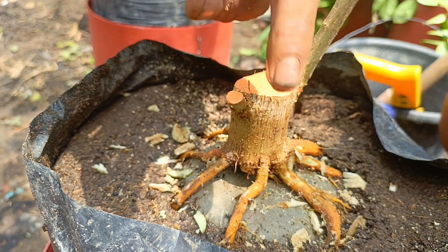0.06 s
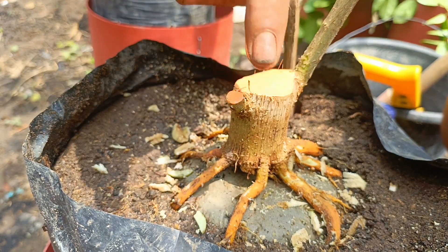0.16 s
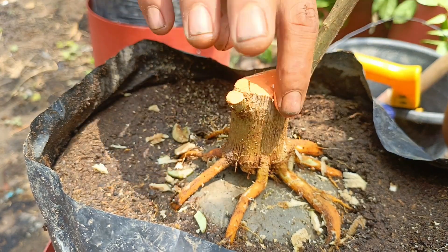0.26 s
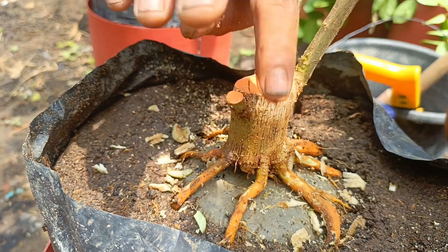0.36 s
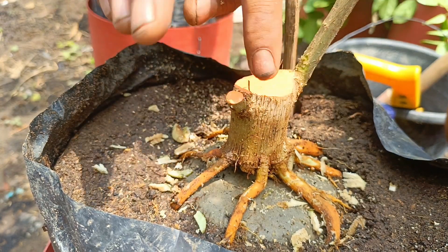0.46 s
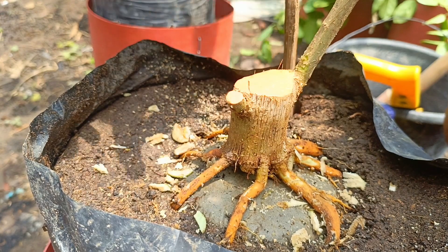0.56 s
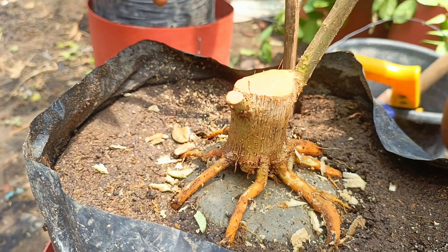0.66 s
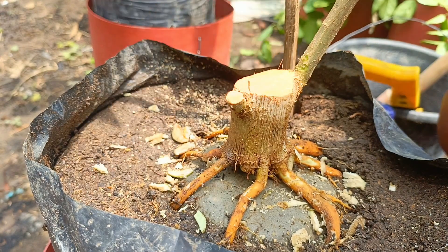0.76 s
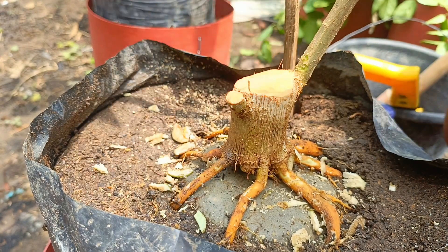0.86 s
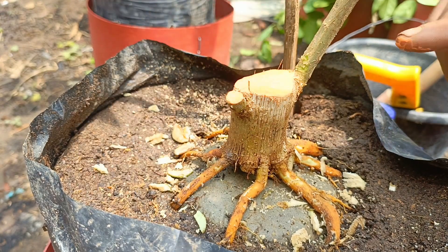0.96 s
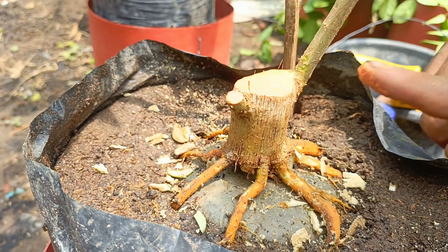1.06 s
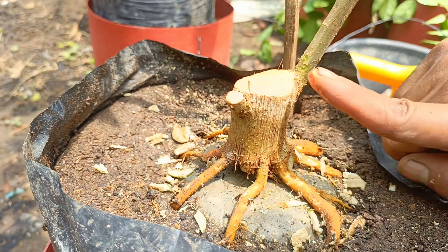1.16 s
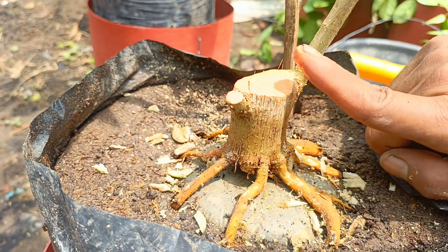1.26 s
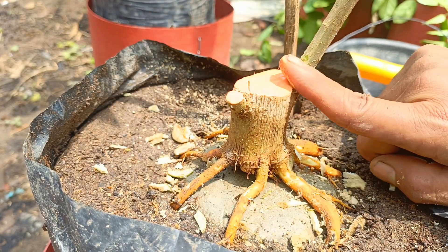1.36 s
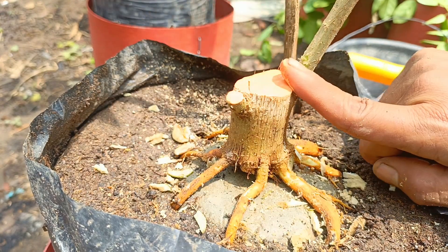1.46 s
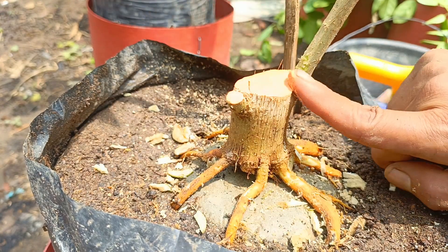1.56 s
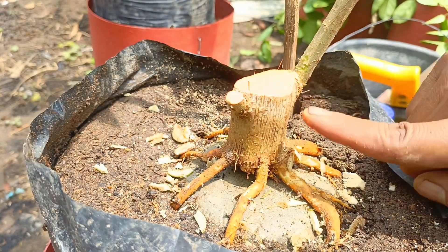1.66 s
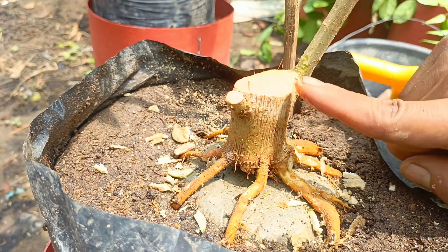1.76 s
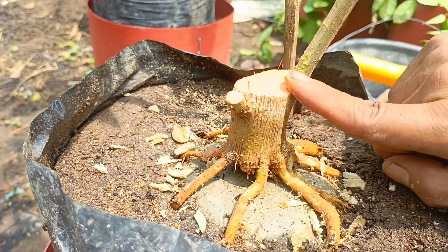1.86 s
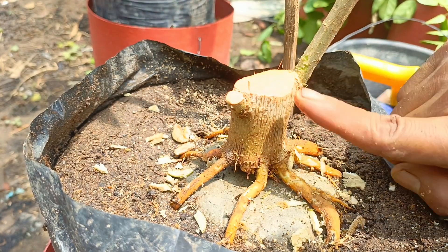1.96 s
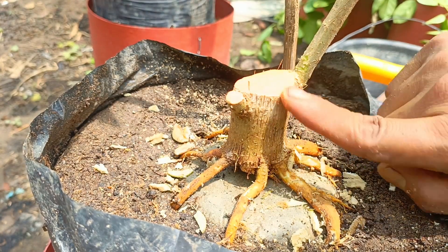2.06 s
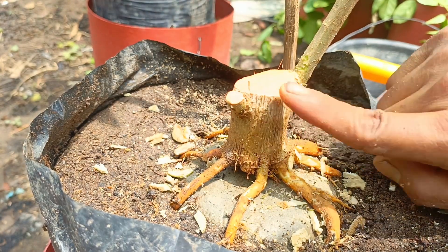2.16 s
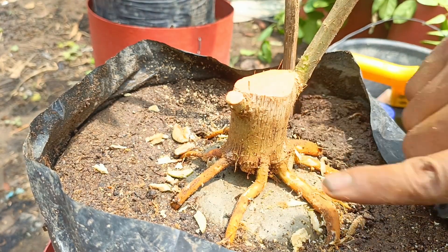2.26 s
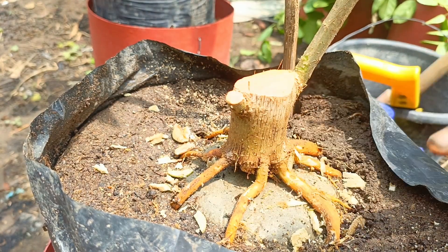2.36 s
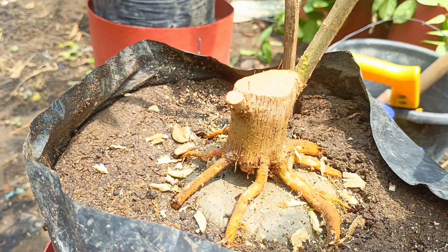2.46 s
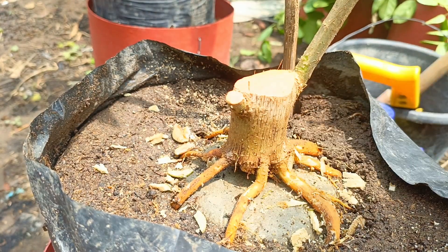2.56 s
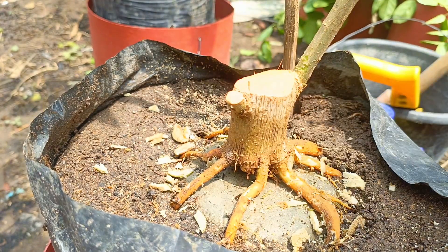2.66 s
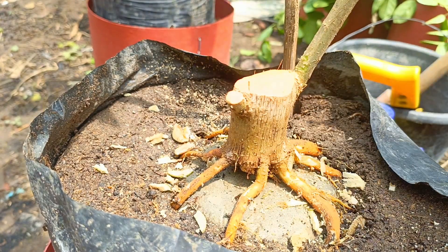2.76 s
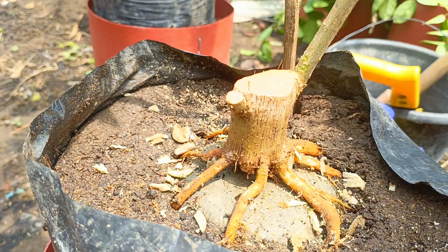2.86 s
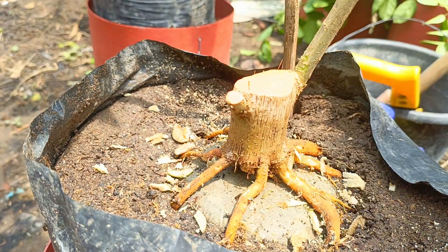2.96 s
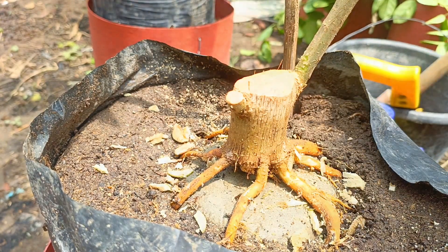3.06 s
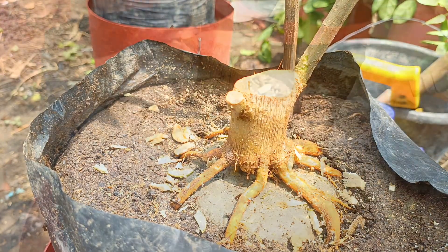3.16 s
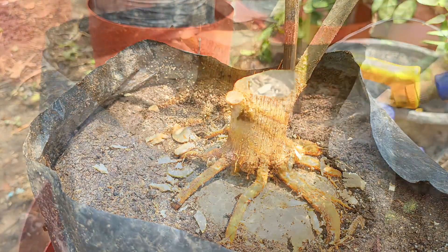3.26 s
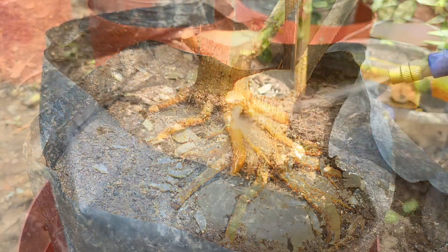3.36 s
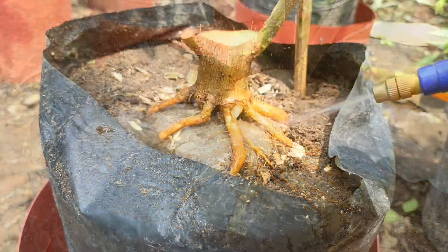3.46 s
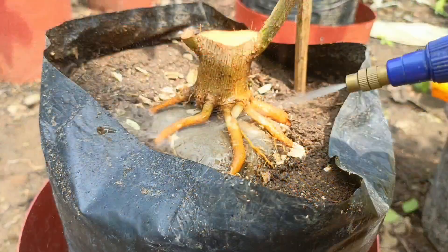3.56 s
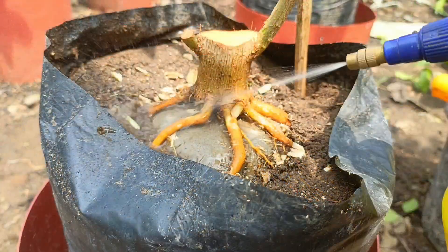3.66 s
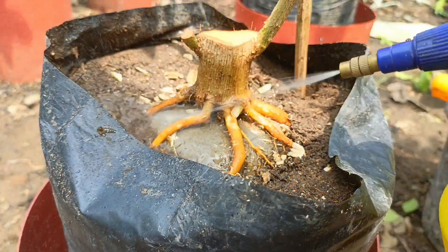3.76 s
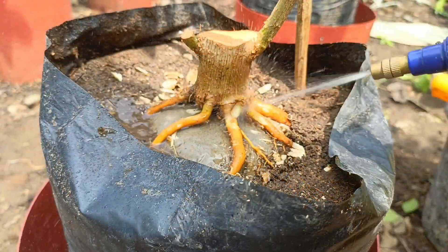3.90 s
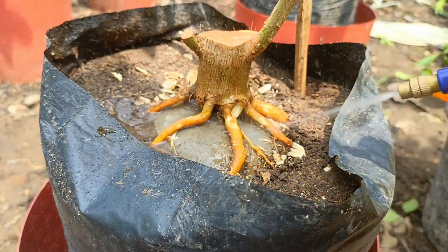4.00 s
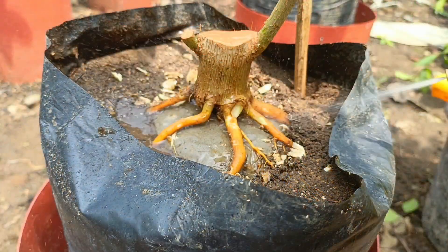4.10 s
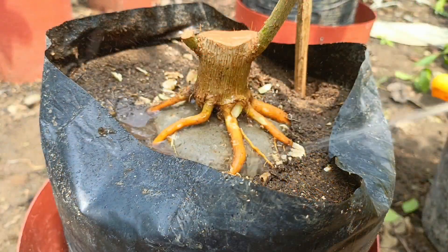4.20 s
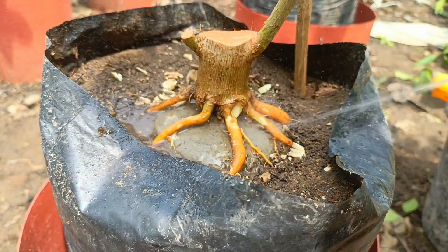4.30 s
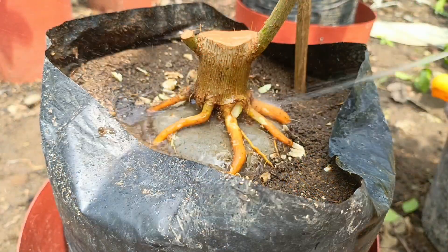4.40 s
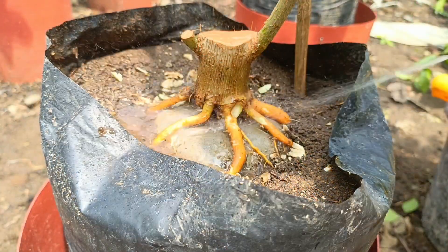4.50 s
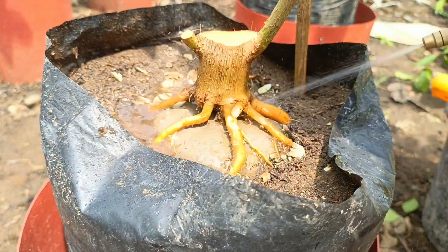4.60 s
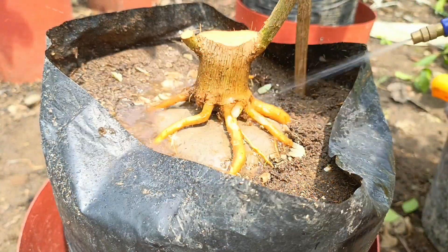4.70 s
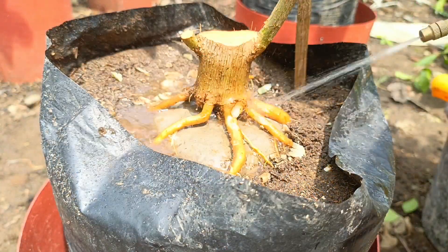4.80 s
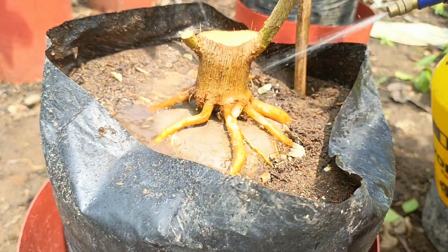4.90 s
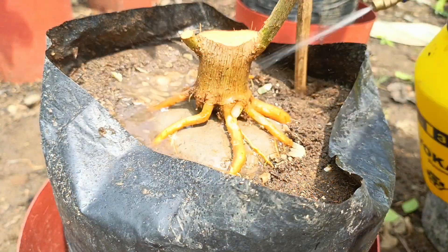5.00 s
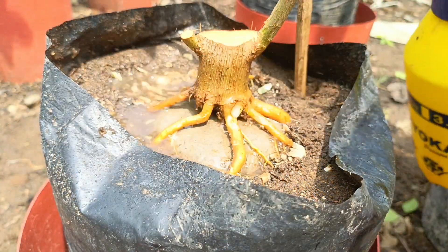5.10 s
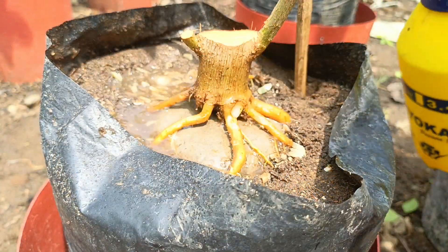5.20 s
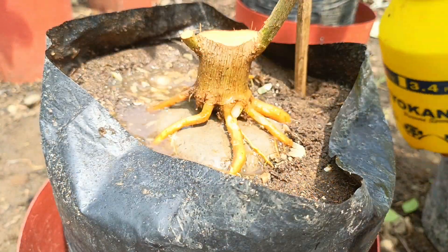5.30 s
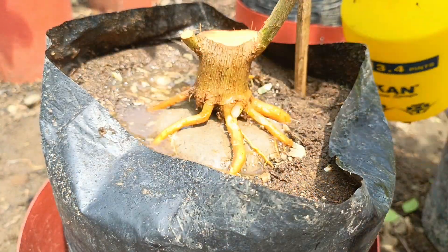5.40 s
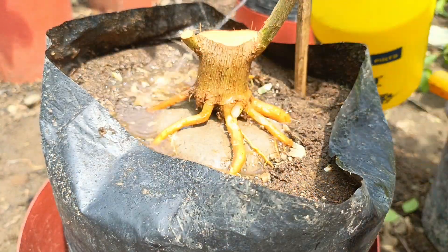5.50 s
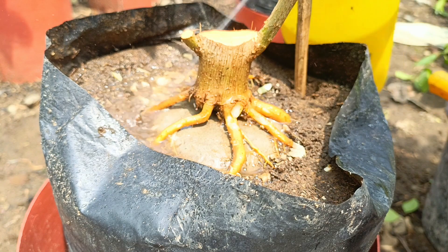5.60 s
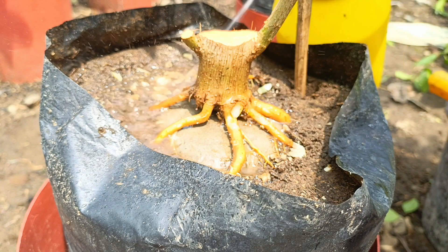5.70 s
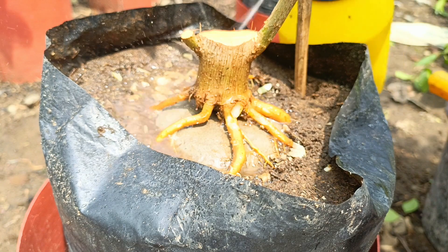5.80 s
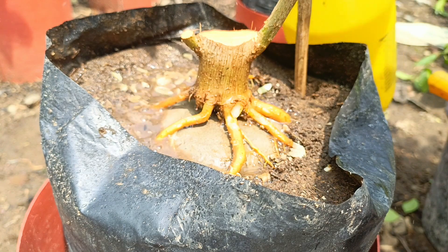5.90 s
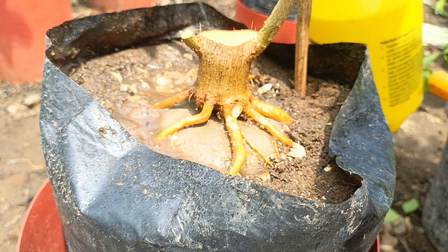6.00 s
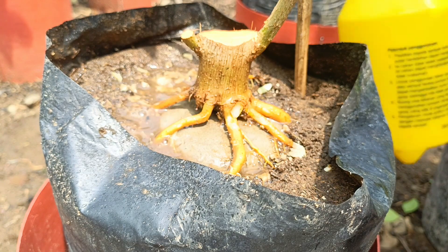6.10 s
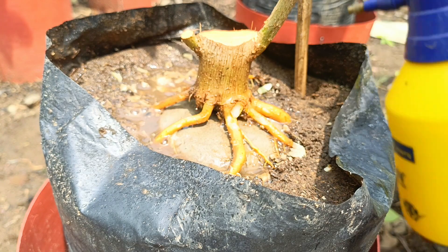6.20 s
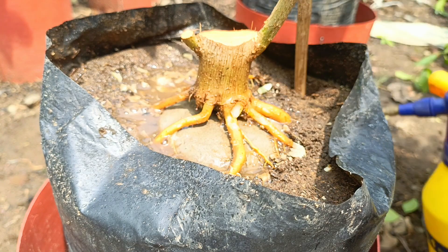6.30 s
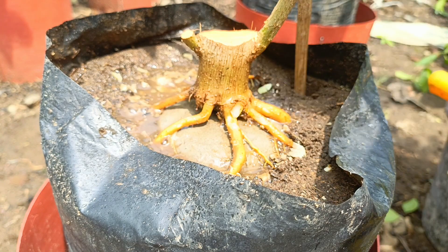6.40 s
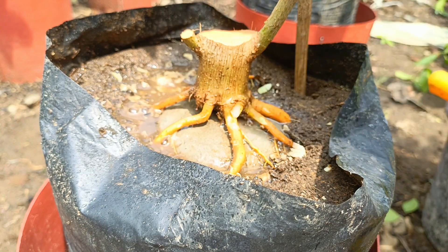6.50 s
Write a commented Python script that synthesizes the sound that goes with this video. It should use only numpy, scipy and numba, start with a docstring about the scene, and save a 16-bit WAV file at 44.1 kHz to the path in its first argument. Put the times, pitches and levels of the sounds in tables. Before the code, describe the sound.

Close outdoor sound, single channel. Faint skin rustles and small dry taps on a woody stump, then a dull low bump on the microphone. At about three seconds a hand sprayer's jet starts abruptly, hissing and spattering on soil with gurgles. It stops; the plastic tank knocks twice, scraping between, then a brief weaker squirt. A bird repeats one note behind the water.

```python
"""Watering a stump by hand

A hand sprayer wets the roots of a stump in a bag of soil, outdoors. First fingers rustle, tap and rub nearby
and the microphone is bumped; then the jet hisses and spatters, is knocked twice and squirts once more.
Drops and bubbles make the jet, ringing modes the knocks and taps, and shaped noise the rustle and background.
A bird repeats one note as near sines; thin tones of narrow noise, perhaps insects, sound behind."""
import sys
import numpy as np
from scipy import signal
from scipy.io import wavfile
from scipy.ndimage import uniform_filter1d
from numba import njit

SR = 44100
rng = np.random.default_rng(int(sys.argv[2]) if len(sys.argv) > 2 else 0)


def transcribe(signal):
    """Save signal, clipped to [-1, 1], as a 16-bit WAV file at the path in sys.argv[1]."""
    frames = np.atleast_2d(signal).T
    limited = np.clip(frames, -1, 1)
    pcm = np.round(limited * 32767).astype(np.int16)
    wavfile.write(sys.argv[1], SR, pcm)


N = 288806   # samples


def amp(db):
    """Turn decibels into a gain."""
    return 10 ** (np.asarray(db) / 20)


def rms_one(x):
    """Scale a sound to an average (rms) level of 1."""
    return x / np.sqrt(np.mean(x ** 2) + 1e-20)


def even(x, seconds):
    """Divide out the slow changes of level."""
    return x / np.sqrt(uniform_filter1d(x * x, size=int(seconds * SR)) + 1e-20)


def in_time(tables):
    """Draw lines through the columns over time; the first column is silent outside the tables."""
    t = np.arange(N) / SR
    times, *columns = np.transpose(np.concatenate(tables))
    columns = [np.interp(t, times, column) for column in columns]
    inside = sum((t >= rows[0][0]) & (t <= rows[-1][0]) for rows in tables) > 0
    return [np.where(inside, columns[0], -150), *columns[1:]]


def drift(rate_hz):
    """Slow random wandering around 0 with a spread of 1."""
    step = 20   # computed at every 20th sample, then joined by lines
    r = np.exp(-2 * np.pi * step * rate_hz / SR)
    noise = rng.standard_normal(N // step + 2002)
    slow = signal.lfilter([1], [1, -2 * r, r * r], noise)[2000:]
    return np.interp(np.arange(N) / step, np.arange(len(slow)), rms_one(slow))


def band(x, low_hz, high_hz, order=2):
    """Keep the pitches between two limits."""
    return signal.sosfilt(signal.butter(order, [low_hz, high_hz], "band", fs=SR, output="sos"), x)


def high_pass(x, hz):
    """Steeply remove the pitches below a limit."""
    return signal.sosfilt(signal.butter(8, hz, "high", fs=SR, output="sos"), x)


def resonance(x, hz, width_hz):
    """Favour one pitch, as a ringing body does, with a gain of 1 at the peak."""
    r = np.exp(-np.pi * width_hz / SR)
    feedback = [1, -2 * r * np.cos(2 * np.pi * hz / SR), r * r]
    return signal.lfilter(np.array([1, 0, -1]) * (1 - r * r) / 2, feedback, x)


@njit
def sweep(x, hz, width_hz, sr):
    """A resonance whose pitch moves from sample to sample."""
    out, r = np.zeros(len(x)), np.exp(-np.pi * width_hz / sr)
    for i in range(2, len(x)):
        ringing = 2 * r * np.cos(2 * np.pi * hz[i] / sr) * out[i - 1] - r * r * out[i - 2]
        out[i] = x[i] - x[i - 2] + ringing
    return out


def grains(per_s, spread_db):
    """Random clicks of uneven size and sign."""
    sizes = amp(spread_db * np.minimum(rng.exponential(1, N), 4)) * rng.choice([-1, 1], N)
    return rms_one(sizes * (rng.random(N) < per_s / SR))


def coloured(sources, spectrum, patchy_db, rate_hz, tilt=None):
    """Split into third-octave bands that flicker separately; tilt(hz) adds a moving colour in dB."""
    hz_db, out = np.array(spectrum), 0
    lowest, highest = hz_db[0, 0], hz_db[-1, 0]
    edges = np.geomspace(lowest, highest, int(3 * np.log2(highest / lowest)) + 2)
    for k, (low, high) in enumerate(zip(edges, edges[1:])):
        hz = np.sqrt(low * high)
        level_db = np.interp(np.log(hz), np.log(hz_db[:, 0]), hz_db[:, 1]) + patchy_db * drift(rate_hz)
        if tilt:
            level_db = level_db + tilt(hz)
        out = out + amp(level_db) * band(sources[k % 2], low, high)
    return out


def add(out, start_s, sound):
    """Mix a sound in at a time."""
    i = round(start_s * SR)
    out[i:i + len(sound)] += sound[:N - i]


def swell(length_s, edge):
    """An envelope that rises and falls smoothly; edge is the share of its length spent on that."""
    return signal.windows.tukey(int(length_s * SR), np.clip(edge, 0, 1))


def fade(length_s, from_db, to_db):
    """A gain that slides steadily in decibels."""
    return amp(np.linspace(from_db, to_db, int(length_s * SR)))


def narrow_noises(rows, width_hz, edge, fade_db):
    """Noise twice through a narrow resonance that may glide: it sets in, wavers and fades."""
    out, run_in = np.zeros(N), 6000   # samples for the resonance to settle, then dropped
    for (s, length, hz, db, *end_hz), noise in zip(rows, rng.standard_normal((len(rows), 2 * SR))):
        shape, width = swell(length, edge), float(width_hz(hz))
        path = np.r_[np.full(run_in, hz), np.linspace(hz, (end_hz or [hz])[0], len(shape))]
        once = sweep(noise[:len(path)], path, width, SR)
        tone = sweep(once, path, width, SR)[run_in:]
        add(out, s, amp(db) * fade(length, 0, fade_db) * rms_one(tone) * shape)
    return out


def bubbles(per_s, cycles, rise, pitches, weight_db):
    """Drops trap bubbles that ring a few cycles as their pitch climbs; weight_db(hz) favours sizes."""
    born, dealt, out = grains(per_s, 2.0), rng.integers(0, len(pitches), N), 0
    for k, hz in enumerate(pitches):
        turns = np.arange(int(cycles / hz * SR)) / SR * hz
        envelope = amp(-60 * turns / cycles) * (1 - np.exp(-turns))
        ping = envelope * np.sin(2 * np.pi * turns * (1 + rise * turns / cycles))
        starts = born * (dealt == k) * amp(weight_db(hz))
        out = out + signal.oaconvolve(starts, rms_one(ping) / np.sqrt(len(turns)))[:N]
    return out


# the jet on the soil, a long squirt and a short one:
# time_s, splash_db, gurgle_db (puddle, relative to the splash), colour_hz (splash colour)
JET_PATH = [
    [(3.0785, -40, -30, 5300), (3.081, -22, -29.5, 5350), (3.16, -20.5, -31, 4440),
     (3.21, -22.5, -22, 3140), (3.275, -21.5, -1, 5300), (3.335, -24, -12.5, 3600), (3.41, -18, -24, 5700),
     (3.47, -24.5, -14, 4100), (3.63, -19, -11.5, 3900), (3.70, -19, -17, 4800), (3.765, -29, -15, 4230),
     (3.80, -21, -28, 5360), (3.88, -24.5, -14, 3370), (3.99, -23, -22, 5330), (4.09, -21.5, -14.5, 4080),
     (4.14, -20, -17.5, 5000), (4.22, -22, -35, 5230), (4.29, -18, -23, 5000), (4.325, -12.5, -13, 4400),
     (4.37, -21.5, -15, 5000), (4.44, -25.5, -27.5, 4900), (4.55, -19.5, -26, 3440),
     (4.59, -25.5, -21, 3700), (4.62, -18.5, -9.5, 3300), (4.66, -24.5, -11, 4000),
     (4.70, -18.5, -17, 4570), (4.775, -17.5, -9, 3030), (4.86, -21, -12, 4540), (5.04, -24, -25, 3700),
     (5.125, -20.5, -9, 3380), (5.15, -38.5, 5, 3000), (5.187, -49, 2, 3000)],
    [(5.555, -50, -16, 6100), (5.595, -28.5, -10.5, 6560), (5.77, -29.5, -22.5, 5260),
     (5.83, -26, -34, 3700), (5.85, -22, -20, 3300), (5.89, -22.5, -14, 3600), (5.947, -53, -12, 5600)],
]


def jet():
    """Water drops beat on wet soil, the nozzle hisses and the puddle gurgles."""
    splash_db, gurgle_db, colour_hz = in_time(JET_PATH)
    clumps = amp(2.1 * drift(27) + 1.3 * drift(90))   # the stream breaks into clumps of drops
    drops = [grains(9000, 4.4) + 0.63 * rng.standard_normal(N) for _ in range(2)]
    water = splash(drops, clumps, colour_hz) + amp(gurgle_db) * puddle(gurgle_db)
    out = amp(splash_db) * water + hiss(drops, clumps) + spatters(splash_db)
    return high_pass(out, 540)


# colour of the patter of drops: pitch_hz, level_db (per Hz)
PATTER_SPECTRUM = [(530, -79), (900, -9), (1170, 0.5), (1260, -14.5), (1440, 4), (3260, 0), (4960, 2),
                   (8030, 2), (11000, -44), (14300, -24.5), (22000, -120)]


def splash(drops, clumps, colour_hz):
    """Drops patter, fizz and chirp with a colour that follows what the jet hits."""
    def hump(hz):
        return 10.0 * np.exp(-(np.log2(hz / colour_hz) / 1.24) ** 2)

    def fizz_db(hz):
        return 1.38 * hump(hz) + 7.9 * drift(6.5)

    patter = even(coloured(drops, PATTER_SPECTRUM, 1.95, 36, hump), 0.24)
    fizz = even(bubbles(1500, 26.4, 0.31, np.geomspace(1500, 8500, 24), fizz_db), 0.073)
    # the hollow dug by the jet opens and closes, so its resonances swirl
    swirl = 0
    for drop, share in zip(drops, (1.05, .65)):
        path = np.clip(share * colour_hz * 2 ** (0.3 * drift(6.1)), 1300, 10000)
        swirl = swirl + rms_one(sweep(drop, path, 370.0, SR)) * amp(3.3 * drift(9.3))
    # sparser bubbles ring longer, so their rising pitch is heard
    chirps = even(bubbles(120, 90.0, .5, np.geomspace(1800, 6500, 14), hump), .4)
    # single big drops crack
    cracks = rms_one(band(grains(250, 3.7), 1800, 10600))
    mix = patter + amp(-3.0) * (fizz + even(swirl, .5)) + amp(-10.0) * chirps + amp(-11.0) * cracks
    return rms_one(high_pass(mix, 1420) * clumps)


def puddle(gurgle_db):
    """Bubbles gurgle in the puddle: the louder the gurgle, the lower its lowest pitches."""
    # lowest pitch: around 621 Hz when the gurgle equals the splash, higher when it is weaker
    edge_hz = 621 * 2 ** (-.038 * gurgle_db + 0.15 * drift(8))

    def pitch_db(hz):
        return 3.5 * drift(6) - 35 * np.clip(8 * np.log2(edge_hz / hz), 0, 1)

    return even(bubbles(700, 60.0, .08, np.geomspace(540, 1600, 18), pitch_db), 0.17)


# level of the nozzle hiss in each squirt, surging and dipping, then stopping: time_s, level_db
HISS_LEVEL = [
    [(3.08, -34), (3.62, -35), (3.64, -26), (4.0, -38), (4.32, -24), (4.38, -38.5), (4.77, -35),
     (5.13, -43), (5.17, -67)],
    [(5.555, -60), (5.561, -42), (5.599, -31), (5.769, -32), (5.801, -44), (5.887, -32.5), (5.911, -53),
     (5.915, -36), (5.95, -71)],
]
# colour of the hiss: pitch_hz, level_db (per Hz)
HISS_SPECTRUM = [(5290, -22.5), (9000, -1), (10400, -11.5), (12700, -9), (15100, -1), (16200, -8)]


def hiss(drops, clumps):
    """Water rushing through the nozzle: bright noise mixed with some of the drops."""
    rush = rng.standard_normal((2, N)) + .5 * np.array(drops)
    level_db = in_time(HISS_LEVEL)[0] + 1.5 * drift(12)
    return amp(level_db) * rms_one(coloured(rush, HISS_SPECTRUM, 0.48, 20)) * clumps ** 0.84


# heavy drops: start_s, pitch_hz
HEAVY_DROPS = [(3.0826, 4900), (3.1225, 4100), (3.138, 4240), (3.159, 4000), (3.263, 6240), (3.3338, 3300),
               (3.405, 5000), (3.564, 5550), (3.6139, 3240), (3.7049, 3350), (3.783, 7840), (3.8433, 3300),
               (3.9813, 4900), (4.0755, 2700), (4.1607, 4650), (4.2333, 6040), (4.2812, 5040),
               (4.3148, 4250), (4.45, 5500), (4.5172, 5700), (4.608, 2600), (4.691, 5840), (4.7586, 1640),
               (4.8555, 4530), (5.5953, 8140), (5.6287, 7750), (5.8461, 3230), (5.916, 8130)]


def spatters(splash_db):
    """Each heavy drop is a very short noise burst around its own pitch."""
    t, out = np.arange(int(.04 * SR)) / SR, np.zeros(N)
    for (s, hz), noise in zip(HEAVY_DROPS, rng.standard_normal((len(HEAVY_DROPS), len(t)))):
        burst = noise * amp(-60 * t / 0.014) * (1 - np.exp(-t / 0.00045))
        burst = band(3.8 * resonance(burst, hz, 0.18 * hz) + 0.11 * burst, 1300, 15000, order=4)
        peak_db = splash_db[round(s * SR)] + 14   # stands out from the splash
        add(out, s, amp(peak_db) * burst / np.max(np.abs(burst)))
    return out


# the tank knocks on a hard rim: start_s, peak_db, brightness_db_per_octave, fade_s (time to fall 60 dB)
TANK_KNOCKS = [(5.189, 1, -1, 0.087), (5.195, -1, 4, 0.024), (5.213, -12, -4, 0.099), (5.408, 3, 1, 0.03),
               (5.419, -11, -0.5, 0.064), (5.443, -11.5, -0.5, 0.06), (5.476, -19.5, -4, 0.018)]
# pitches at which the tank rings: pitch_hz, width_hz, level_db
TANK_MODES = [(239, 82, -14), (420, 180, 0), (720, 300, 2), (975, 91, 1.5), (1224, 166, 4),
              (1550, 240, 1.5), (2086, 150, 1), (2660, 500, -3.5), (3700, 1600, -1), (5560, 1100, -6),
              (7500, 1100, -9.5)]


def knocks():
    """A rattling contact, dying fast, drives the heavily damped tank."""
    t, out = np.arange(int(.15 * SR)) / SR, np.zeros(N)
    noises = rng.standard_normal((len(TANK_KNOCKS), len(t)))
    for (s, db, bright_db, t60), noise in zip(TANK_KNOCKS, noises):
        rattle, body = noise * amp(-60 * t / t60), 0
        for k, (hz, width, level_db) in enumerate(TANK_MODES):
            gain = amp(level_db + bright_db * np.log2(hz / 1000)) * (-1) ** k / np.sqrt(width)
            body = body + gain * resonance(rattle, hz, width)
        add(out, s, amp(db) * body / np.max(np.abs(body)))
    return out


# the tank drags over the rim: time_s, level_db, low_part_db (relative to the level)
SCRAPE_LEVEL = [
    [(5.225, -58, 4.5), (5.265, -46.5, 0.5), (5.397, -25.5, 0.5), (5.408, -37, -17.5)],
    [(5.42, -33, 6.5), (5.484, -46.5, 12), (5.52, -50, -27), (5.555, -56.5, -24)],
]
# pitches of the tank wall: pitch_hz, width_hz, level_db
WALL_MODES = [(1960, 120, 1), (2600, 130, 2), (3600, 140, -2), (4550, 160, -6), (7070, 200, -15)]


def scrape():
    """Rough sliding excites the tank wall, each mode catching and letting go, with a hollow low part."""
    level_db, low_db = in_time(SCRAPE_LEVEL)
    rub, wall = grains(4000, 3.5) + rng.standard_normal(N), 0
    for k, (hz, width, db) in enumerate(WALL_MODES):
        wall = wall + amp(db + 5.0 * drift(11)) * (-1) ** k * resonance(rub, hz, width)
    wall = even(wall, 0.035) + .35 * rms_one(band(rub, 1500, 6000))
    hollow = amp(low_db + 3.5 * drift(30.7)) * rms_one(band(rub, 630, 1100))
    return amp(level_db) * (rms_one(wall) + hollow)


# hands on bark and bag: start_s, length_s, scuff_db, crisp_db (treble, relative to the scuff)
RUSTLE_STROKES = [(0.009, 0.082, -62, 9.5), (0.239, 0.15, -59, 7.5), (0.53, 0.054, -60, 8),
                  (0.611, 0.087, -60.5, 14), (0.748, 0.11, -55.5, 8.5), (0.904, 0.082, -57, 6.5),
                  (0.998, 0.1, -58.5, 1), (1.124, 0.092, -51, -0.5), (1.204, 0.11, -41.5, -6),
                  (1.484, 0.12, -46, -9), (1.624, 0.043, -51, -9), (1.675, 0.18, -52, -5),
                  (1.852, 0.071, -59.5, 10.5), (1.915, 0.073, -46, -6), (2.037, 0.052, -53, 2.5),
                  (2.12, 0.059, -50.5, -0.5), (2.253, .14, -49.5, 0), (2.592, 0.051, -56, 10.5),
                  (2.69, 0.34, -57.5, -9), (5.938, 0.085, -55.5, -3), (6.217, .058, -48, 1.5),
                  (6.398, 0.025, -47, -13)]
# broad pitches of the scuff: pitch_hz, width_hz, level_db
SCUFF_MODES = [(1830, 420, 7.5), (2480, 280, 8.5), (3500, 2100, 5), (4740, 950, 6)]


def rustle():
    """Skin scuffs over bark and plastic: grains into broad modes, with a crisp treble and an airy top."""
    scuff, body = grains(3000, 3.6) + 1.9 * rng.standard_normal(N), 0
    for k, (hz, width, db) in enumerate(SCUFF_MODES):
        body = body + amp(db + 4.3 * drift(11.0)) * (-1) ** k * resonance(scuff, hz, width)
    body = even(band(body, 1180, 5400), 0.27)
    crisp_spectrum = [(5300, 1.5), (8000, 10), (11500, -33)]   # pitch_hz, level_db (per Hz)
    crisp = even(coloured([scuff, grains(4300, 2.3)], crisp_spectrum, 6.6, 29), 0.029)
    airy = even(band(scuff, 9400, 16000), .1)
    gains = np.zeros((3, N))
    for s, length, db, crisp_db in RUSTLE_STROKES:
        stroke = swell(length, 0.34) * fade(length, 0, -4.0)
        # the airy top stays 11 dB under the crisp treble
        for gain, layer_db in zip(gains, (db, db + crisp_db, db + crisp_db - 11)):
            add(gain, s, amp(layer_db) * stroke)
    return np.sum(gains * [body, crisp, airy], axis=0)


# finger taps: start_s, peak_db (of the ringing), brightness_db_per_octave
FINGER_TAPS = [(.622, -39, 19), (1.1885, -37, 8), (1.357, -34, 7.5), (1.4999, -28.5, 6.5),
               (1.5647, -33, 6.5), (1.5847, -32.5, 10), (1.7311, -26.5, 13), (1.8684, -39, 19),
               (1.93, -16, 9.5), (2.074, -26.5, 11), (2.2088, -34, 3.5), (2.2638, -42, 16),
               (2.307, -41, 12), (2.366, -33, -7), (2.8058, -39, 20.5)]
# pitches that ring at a tap: pitch_hz, level_db, fade_s (time to fall 60 dB)
TAP_RINGS = [(885, -6.5, 0.023), (1793, 5, 0.016), (2470, -4.5, 0.018), (3910, -9.5, 0.012),
             (4900, -2, 0.0039), (6830, -7, 0.0035)]


def taps():
    """Each tap rings every mode with its own strength and adds a crack of noise."""
    t, out = np.arange(int(.06 * SR)) / SR, np.zeros(N)
    hz, level_db, t60 = np.transpose(TAP_RINGS)[:, :, None]
    for s, db, bright_db in FINGER_TAPS:
        chance_db = 2.0 * rng.standard_normal((len(hz), 1))
        strength = amp(level_db + bright_db * np.log2(hz / 2000) + chance_db)
        rings = np.sum(strength * amp(-60 * t / t60) * np.sin(2 * np.pi * hz * t), axis=0)
        rings = rings * (1 - np.exp(-t / 0.0017))   # soft start
        crack = band(rng.standard_normal(len(t)), 2200, 8700) * amp(-15.5 + bright_db - 60 * t / 0.024)
        add(out, s, amp(db) * (rings / np.max(np.abs(rings)) + crack))
    return out


# bumps carried into the microphone: start_s, level_db (before the band filter), pitch_hz, fade_s (60 dB)
MICROPHONE_BUMPS = [(2.394, -28.5, 84, 0.098), (2.529, -8, 141, 0.094), (2.558, -22, 153, .04),
                    (2.569, 7, 132, 0.036), (4.328, -27.5, 88, 0.011), (5.216, -16, 327, 0.033),
                    (5.409, -1, 208, 0.022)]


def bumps():
    """Low swings with a soft start that die away quickly."""
    t, out = np.arange(int(.3 * SR)) / SR, np.zeros(N)
    for s, db, hz, t60 in MICROPHONE_BUMPS:
        swing = np.sin(2 * np.pi * hz * t) + 0.35 * np.sin(2 * np.pi * 1.46 * hz * t)
        add(out, s, amp(db - 60 * t / t60) * swing * (1 - np.exp(-(t / 0.0027) ** 2)))
    return band(out, 60, 490, order=3)


# short hollow hums: start_s, length_s, pitch_hz, level_db, end_pitch_hz (only if it glides)
HOLLOW_HUMS = [(.46, 0.16, 434, -48.5), (1.212, 0.071, 670, -35.5), (1.216, 0.095, 294, -39.5),
               (1.42, 0.052, 300, -50.5), (1.46, 0.13, 516, -46.5), (1.59, .1, 530, -55),
               (1.70, 0.14, 860, -43, 790), (2.29, .11, 779, -40.5), (2.44, 0.087, 90, -44),
               (2.60, 0.09, 107, -50), (2.77, 0.096, 578, -51), (3.15, 0.076, 297, -39),
               (3.30, .14, 105, -40), (5.27, 0.06, 720, -37), (5.335, 0.032, 408, -35),
               (5.37, 0.036, 1960, -38), (5.42, 0.076, 123, -43), (5.60, 0.082, 913, -43),
               (5.855, 0.06, 1228, -35), (5.92, 0.048, 1200, -45), (6.28, 0.11, 784, -55)]


def hums():
    """Noise in resonances 89 Hz wide, so the hums are rough in pitch."""
    return narrow_noises(HOLLOW_HUMS, lambda hz: 89, 0.22, -5.0)


# bird notes: start_s, length_s, level_db
BIRD_NOTES = [(3.969, .21, -29), (4.218, 0.043, -33), (4.311, 0.15, -30), (4.551, 0.17, -30),
              (4.82, 0.21, -32), (5.069, .135, -28), (5.46, 0.11, -41)]


def bird():
    """Near sines on one note that sag a little and waver in pitch and level."""
    start_hz, sag_hz_per_s = 1277, 120
    out, waver, wobble_hz = np.zeros(N), amp(2.5 * drift(25)), 9.0 * drift(12)
    for s, length, db in BIRD_NOTES:
        shape = swell(length, .45) * fade(length, 2.5, -3.5)
        wobble = wobble_hz[round(s * SR):][:len(shape)]
        hz = start_hz - sag_hz_per_s * np.arange(len(shape)) / SR + wobble
        add(out, s, amp(db) * shape * np.sin(2 * np.pi * np.cumsum(hz) / SR))
    return out * waver


# thin tones, perhaps insects: start_s, length_s, pitch_hz, level_db, end_pitch_hz (only if it glides)
THIN_TONES = [(.05, .95, 5780, -64), (.21, .21, 1620, -63), (.24, .16, 7350, -62), (.27, .11, 8550, -59),
              (.615, .14, 8300, -57), (.62, .25, 7100, -62), (.5, .45, 4420, -65),
              (.9, .06, 9200, -60, 7900), (1.06, .2, 7300, -63), (2.5, .12, 4500, -61),
              (2.79, .15, 5140, -49, 5250), (2.865, .045, 4650, -46, 4200), (2.87, .04, 3600, -56),
              (3.01, .17, 1047, -55), (5.22, .34, 4600, -58), (5.93, .36, 4480, -55, 4700),
              (6.27, .28, 4600, -65), (5.98, .28, 8690, -62)]


def insects():
    """Noise in resonances only 3 % of the pitch wide, flickering in level."""
    return narrow_noises(THIN_TONES, lambda hz: .03 * hz, .5, -1.0) * amp(4.5 * drift(16))


# colour of the soft wide noise: pitch_hz, level_db (per Hz)
WIDE_SPECTRUM = [(35, -46), (60, -10.5), (133, 4), (1380, -6), (1750, -4), (3880, -7), (4460, -6.5),
                 (4900, -15.5), (5910, -8.5), (10900, -25), (15100, -15), (16200, -19)]
# level of the faint high hiss, in two stretches: time_s, level_db
HIGH_HISS_LEVEL = [
    [(0, -63), (.36, -52), (.40, -61), (.53, -65), (.56, -53), (1.29, -59), (1.31, -82), (2.42, -76),
     (2.45, -63), (3.08, -68)],
    [(5.95, -75), (6.26, -71), (6.28, -78), (6.55, -70)],
]


def background_noise():
    """Soft wide noise, and a faint high hiss that steps up and down in level and flickers."""
    wide = rms_one(coloured(rng.standard_normal((2, N)), WIDE_SPECTRUM, 0.69, 8))
    high_hiss = rms_one(band(rng.standard_normal(N), 7000, 22000)) * amp(3.9 * drift(15))
    return amp(-56.5) * wide + amp(in_time(HIGH_HISS_LEVEL)[0]) * high_hiss


def scene():
    """Add up all sources as one channel."""
    sprayer = jet() + knocks() + scrape()
    hands = rustle() + taps() + bumps()
    background = hums() + bird() + insects() + background_noise()
    return (sprayer + hands + background)[None]


def record(dry):
    """Flatten the loudest peaks, then cut the top above 15950 Hz."""
    top_cut = signal.ellip(12, .5, 80, 15950, fs=SR, output="sos")
    return signal.sosfilt(top_cut, np.clip(dry, -.97, .97))


dry = scene()
out = record(dry)
transcribe(out)
```